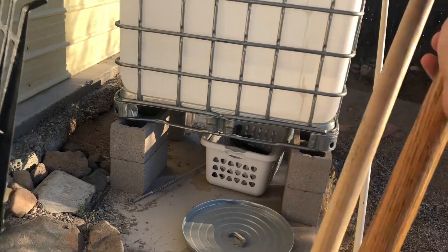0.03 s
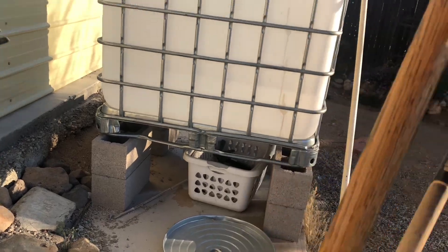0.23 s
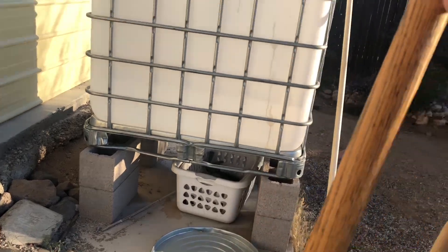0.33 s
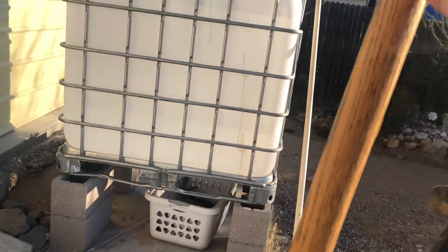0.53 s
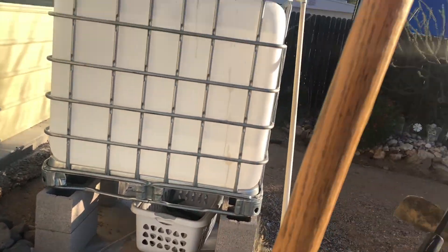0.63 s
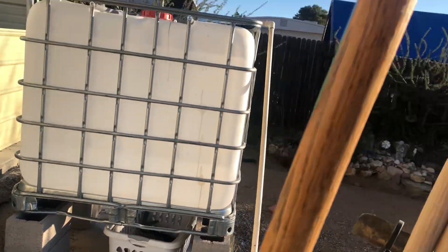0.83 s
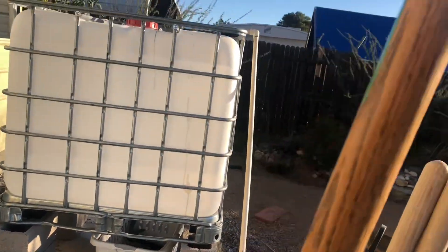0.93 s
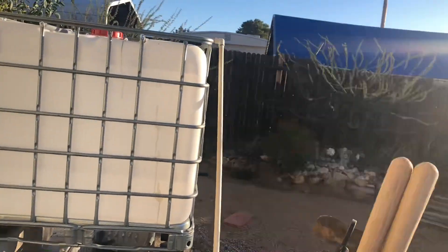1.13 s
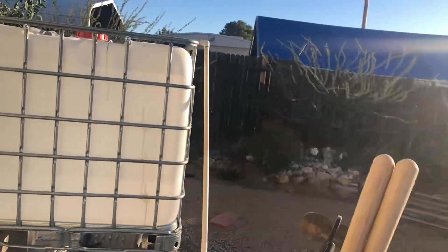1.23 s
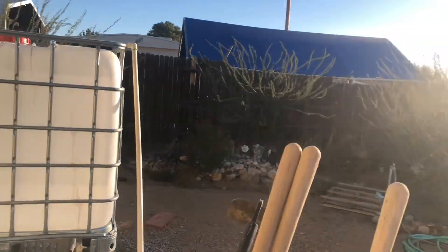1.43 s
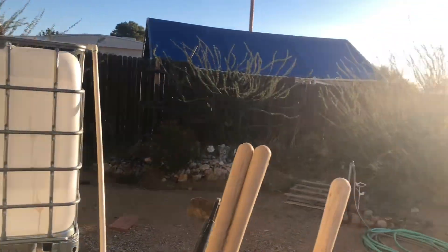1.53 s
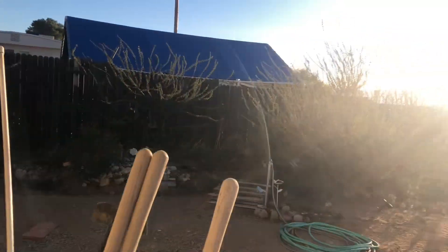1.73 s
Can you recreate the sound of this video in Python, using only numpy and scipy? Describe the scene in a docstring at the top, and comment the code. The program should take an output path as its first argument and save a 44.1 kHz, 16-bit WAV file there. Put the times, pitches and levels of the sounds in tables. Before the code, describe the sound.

Long wooden shafts rattle hollowly and rub, one slides out thinly, and a woody clack follows

```python
"""Outdoors, a long wooden handle is dragged out from a bunch of garden tools. Random stick-slip clicks make its
rubbing, dry grain and low drone; gliding tones make its squeaks. Knocks ring the neighbours hollowly through
fading tones and noise, and low tones thump below. The handle slides free in a thin hiss of tiny clicks with
sharp ticks. The tools left behind fall together with one woody, slightly metallic clack of snaps, chatter and
ringing tones. Faint outdoor air, a coloured noise, lies underneath."""
import sys
import numpy as np
from scipy import signal
from scipy.fft import rfft, irfft
from scipy.io import wavfile
from scipy.ndimage import uniform_filter1d

SR = 44100
rng = np.random.default_rng(int(sys.argv[2]) if len(sys.argv) > 2 else 0)


def generate_wav(sig):
    """Save sig (samples, or channels by samples) to the path in sys.argv[1] as 16-bit PCM at SR."""
    pcm = np.round(np.clip(np.atleast_2d(sig).T, -1, 1) * 32767).astype(np.int16)
    wavfile.write(sys.argv[1], SR, pcm)


N = 79380
T = np.arange(N) / SR  # time in seconds
# A t60 is the time a sound takes to fade by 60 dB. A colour's levels are relative, per Hz of bandwidth.


def from_db(db):
    """Turn decibels into a gain."""
    return 10 ** (np.asarray(db) / 20)


def rms_one(x):
    """Scale to an rms (average strength) of one."""
    return x / np.sqrt(np.mean(x ** 2) + 1e-20)


def level(curve):
    """Turn a table of times and decibels into a gain over time."""
    return from_db(np.interp(T, *np.transpose(curve)))


def at_hz(points, hz):
    """Read a table at a frequency, in even steps of pitch."""
    table_hz, value = np.transpose(points)
    return np.interp(np.log(hz + 0.00086), np.log(table_hz), value)  # the offset avoids log(0)


def dying(t60):
    """Fade exponentially, by 60 dB in t60 seconds."""
    return np.exp(-np.log(1000) * T / t60)


def rising(time_constant):
    """Build up smoothly from silence, with a time constant in seconds."""
    return 1 - np.exp(-T / time_constant)


def at_time(x, s):
    """Delay a sound so that it starts at s seconds."""
    silence = np.zeros(max(int(s * SR), 0))
    return np.concatenate([silence, x])[:N]


def coloured(x, colour):
    """Filter a steady texture by a colour table; the result has an rms of one."""
    gain = from_db(at_hz(colour, np.fft.rfftfreq(N, 1 / SR)))
    return rms_one(irfft(rfft(x) * gain, N))


def dense_ring(source, colour, t60s):
    """Imitate countless close resonances: third-octave noise bands, each fading at its own rate."""
    hz = np.fft.rfftfreq(N, 1 / SR)
    spectrum = rfft(coloured(source, colour))
    edges = np.geomspace(60, 17000, 25)
    ring = np.zeros(N)
    for low, high in zip(edges, edges[1:]):
        band = irfft(spectrum * ((hz >= low) & (hz < high)), N)
        ring += band * dying(at_hz(t60s, np.sqrt(low * high)))
    return ring


def mode(hz, db, t60):
    """Ring one resonance as a fading sine."""
    return from_db(db) * np.sin(2 * np.pi * hz * T) * dying(t60)


def contact(x, bright_hz, bass_hz):
    """A soft contact loses treble, a glancing one loses bass."""
    treble_cut = signal.butter(2, min(bright_hz, SR / 3), fs=SR, output="sos")
    bass_cut = signal.butter(1, bass_hz, "high", fs=SR, output="sos")
    softened = signal.sosfilt(treble_cut, x + 1e-18)
    return signal.sosfilt(bass_cut, softened)


def slips(per_s, spread_db):
    """Scatter stick-slip clicks of uneven size at random, per_s a second on average; rms of one."""
    sizes = from_db(spread_db * np.minimum(rng.exponential(1, N), 4))
    signs = rng.choice([-1, 1], N)
    return rms_one(sizes * signs * (rng.random(N) < per_s / SR))


def drift(hz):
    """Wander at random, mostly slower than hz; rms of one."""
    lowpass = signal.butter(2, hz, fs=SR, output="sos")
    return rms_one(signal.sosfilt(lowpass, rng.standard_normal(N)))


# Colour of the outdoor air: f/Hz, level/dB
AIR_COLOUR = [(25, 8.5), (60, -4), (200, -2.5), (450, -15), (900, -7.5), (2500, -28), (15500, -41)]
AIR_DB = -61.5


def outdoor_air():
    """Outdoor air is a faint steady noise, strongest in the bass."""
    return from_db(AIR_DB) * coloured(rng.standard_normal(N), AIR_COLOUR)


# Bending resonances of the handles: f/Hz, level/dB, t60/s
HANDLE_MODES = [(310, -8, 0.17), (424.6, -4.5, 0.36), (460, -4.5, 0.17), (670, -6.5, 0.18),
                (762, -12.5, 0.24), (904, -7.5, 0.24), (937.6, -12, 0.35), (1060, -13, 0.24),
                (1119, -10.5, 0.35), (1213, -14.5, 0.26), (1467, -17, 0.17), (1611, -9, 0.16),
                (2128, -6, 0.06)]
STRIKE_SPREAD_DB = 2.5
DETUNE = 0.01504  # typical shift with the point of contact, as a share of pitch


def handle_ring():
    """Each point of contact rings the handles' resonances with its own strengths and small pitch shifts."""
    ring = np.zeros(N)
    draws = rng.standard_normal((len(HANDLE_MODES), 2))
    for k, ((hz, db, t60), (shift, strength)) in enumerate(zip(HANDLE_MODES, draws)):
        tone = mode(hz * (1 + DETUNE * shift), db + STRIKE_SPREAD_DB * strength, t60)
        ring += (-1) ** k * tone
    return ring


# Colour of the ring of the whole bunch and its surroundings: f/Hz, level/dB
BUNCH_COLOUR = [(50, -33), (110, -44), (220, -18.5), (320, -3), (450, 4), (750, -7), (1600, -10),
                (2200, -9), (3100, -5), (4000, -13.5), (6000, -20.5), (15000, -12.5)]
# How long that ring lasts: f/Hz, t60/s
BUNCH_T60 = [(100, 0.84), (450, 0.5), (1500, 0.34), (3800, 0.11), (10000, 0.33)]
BUNCH_DB = -4


def bunch_rings():
    """The bunch rings as dense fading noise, a different one for each of five points of contact."""
    return [from_db(BUNCH_DB) * dense_ring(rng.standard_normal(N), BUNCH_COLOUR, BUNCH_T60)
            for _ in range(5)]


# Colour of the short first burst of a contact: f/Hz, level/dB
CRACK_COLOUR = [(100, -26.5), (420, 11.5), (1000, 0), (1600, -0.5), (2200, 1), (3800, -16), (5000, -12.5),
                (9000, -50)]
CRACK_T60_S = 0.049


def crack_noise():
    """The wood's crack starts as a coloured noise, shared by every contact."""
    return coloured(rng.standard_normal(N), CRACK_COLOUR)


def crack(noise):
    """A contact cracks briefly: the noise from a random starting point, fading fast."""
    return np.roll(noise, rng.integers(N)) * dying(CRACK_T60_S)


# Strength of the shafts' rubbing: t/s, level/dB
RUB_LEVEL = [(0, -45.5), (0.10, -47.5), (0.15, -36), (0.26, -36.5), (0.282, -24.5), (0.325, -33),
             (0.38, -32.5), (0.41, -53), (0.45, -42), (0.468, -36), (0.58, -46), (0.74, -56.5),
             (0.86, -65.5)]
SLIPS_PER_S, SLIP_SPREAD_DB = 480, 2.5
RUB_BRIGHT_HZ, RUB_BASS_HZ = 3750, 285  # treble and bass limits of the contact
RUB_MODES_DB = -7  # rubbing contact damps the resonances


def rubbing(rings, noise):
    """Stick-slip rattle at several points of contact drives the handles and the bunch."""
    out = np.zeros(N)
    for ring in rings:
        body = from_db(RUB_MODES_DB) * handle_ring() + ring + crack(noise)
        body = contact(body, RUB_BRIGHT_HZ, RUB_BASS_HZ)
        rattle = slips(SLIPS_PER_S / len(rings), SLIP_SPREAD_DB)
        rattle = rattle * level(RUB_LEVEL) / np.sqrt(len(rings))
        out += signal.fftconvolve(rattle, body / np.linalg.norm(body))[:N]  # each slip sounds the body
    return out


# Strength of the rubbing wood's dry grain: t/s, level/dB
GRAIN_LEVEL = [(0, -57.5), (0.1, -55), (0.23, -46.5), (0.36, -52.5), (0.45, -52), (0.52, -44),
               (0.55, -53.5), (0.62, -56.5), (0.70, -63), (0.96, -65.5), (1.0, -62)]
# Its colour, shared with the ticks: f/Hz, level/dB
GRAIN_COLOUR = [(700, -17), (4000, -3.5), (6000, -3.5), (8500, 2.5), (10500, 4), (12500, -1.5),
                (15500, 4.5)]
# Brief catches of the grain: t/s, level/dB, t60/s
SCUFFS = [(0.271, -30.5, 0.1), (0.404, -39, 0.11), (0.56, -31.5, 0.041), (0.588, -34, 0.029)]
SCUFF_RISE_S = 0.0059  # time constant
GRAINS_PER_S, GRAIN_SPREAD_DB = 5800, 2


def wood_grain():
    """Fine friction hisses as shaft rubs on shaft, and flares where the grain catches."""
    pressure = level(GRAIN_LEVEL)
    for s, db, t60 in SCUFFS:
        pressure += from_db(db) * at_time(rising(SCUFF_RISE_S) * dying(t60), s)
    return pressure * coloured(slips(GRAINS_PER_S, GRAIN_SPREAD_DB), GRAIN_COLOUR)


# Strength of the dragged shaft's drone: t/s, level/dB
DRONE_LEVEL = [(0, -59), (0.2, -59), (0.33, -43), (0.57, -52), (0.63, -52), (0.75, -55), (1.0, -73)]
# Its colour: f/Hz, level/dB
DRONE_COLOUR = [(50, -32), (90, -13), (110, -1.5), (150, -11), (300, -10.5), (1000, -86)]


def drone():
    """Dragging keeps the long shaft's lowest resonance humming: slips filtered down to the bass."""
    return level(DRONE_LEVEL) * coloured(slips(SLIPS_PER_S, GRAIN_SPREAD_DB), DRONE_COLOUR)


# Handle against handle: t/s, level/dB, treble limit f/Hz, bass limit f/Hz, crack level/dB within the blow
KNOCKS = [(0.069, -36.5, 600, 100, -27), (0.120, -37, 1170, 200, 0), (0.2162, -21.5, 3800, 925, 7),
          (0.221, -21, 3120, 885, 5.5), (0.229, -19, 617, 202, 3.5), (0.235, -22.5, 695, 202, 8),
          (0.274, -20, 1770, 202, 1.5), (0.286, -27, 3400, 260, 4.5), (0.301, -31, 2600, 252, 4),
          (0.320, -29.5, 3200, 397, 2), (0.355, -20, 1470, 1000, 0), (0.461, -29.5, 2570, 486, 2),
          (0.526, -35, 687, 154, 1.5), (0.646, -38.5, 1800, 365, 2.5), (1.327, -41, 3040, 900, 11.5)]
MODES_DB = -3
CONTACT_RISE_S = 0.00047  # time constant: the blow spreads through the bunch


def knocks(rings, noise):
    """A blow cracks and rings the handles and the bunch; its contact sets how bright and full it is."""
    out = np.zeros(N)
    for k, (s, db, bright_hz, bass_hz, crack_db) in enumerate(KNOCKS):
        first_burst = from_db(crack_db) * crack(noise)
        ring = from_db(MODES_DB) * handle_ring() + rings[k % len(rings)]
        blow = rising(CONTACT_RISE_S) * (ring + first_burst)
        out += from_db(db) * at_time(contact(blow, bright_hz, bass_hz), s)
    return out


# The shaft groans, creaks and hums, then squeaks faintly as it comes clear.
# One curve for each: t/s, level/dB, f/Hz
SQUEAKS = [
    [(0.08, -57, 312.6), (0.16, -45, 304.4), (0.275, -34, 292.6), (0.35, -46, 241)],
    [(0.46, -50, 915), (0.50, -40.5, 901), (0.527, -43.5, 874), (0.56, -52, 868)],
    [(0.50, -49, 420), (0.54, -34.5, 425.5), (0.58, -49.5, 430.8), (0.67, -43, 435), (0.79, -54, 433.7)],
    [(1.16, -62, 1703), (1.215, -58, 2044), (1.25, -64, 1920), (1.31, -72, 1750)],
]
SQUEAK_ROUGH = 1.0  # noise over tone at 1 kHz, growing with pitch
SQUEAK_WIDTH = 0.074  # bandwidth of that noise as a share of the pitch


def squeak(curve):
    """Wood sticks and slips in a gliding tone, roughened by random drift."""
    s, db, hz = np.transpose(curve)
    phase = 2 * np.pi * np.cumsum(np.interp(T, s, hz)) / SR
    width_hz = SQUEAK_WIDTH * hz.mean()
    rough = SQUEAK_ROUGH * hz.mean() / 1000
    noise = drift(width_hz) * np.sin(phase) + drift(width_hz) * np.cos(phase)
    tone = np.sin(phase) + rough * noise
    sounding = 1. * ((T > s[0]) & (T < s[-1]))
    gate = uniform_filter1d(sounding, size=400)  # softens the start and end
    return from_db(np.interp(T, s, db)) * gate * rms_one(tone)


def squeaks():
    """Add up the stick-slip tones of the moving shaft."""
    return sum(squeak(curve) for curve in SQUEAKS)


# Heavy blows also thump whatever the tools lean on: t/s, level/dB
THUMPS = [(0.219, -44.5), (0.27, -21), (1.33, -30)]
# Its low resonances: f/Hz, level/dB, t60/s
THUMP_MODES = [(97, -8.5, 0.18), (100.6, -1.5, 0.16)]
THUMP_RISE_S = 0.013  # time constant


def thumps():
    """Heavy blows boom in two close low resonances that swell softly and fade."""
    boom = rising(THUMP_RISE_S) * sum(mode(*row) for row in THUMP_MODES)
    return sum(from_db(db) * at_time(boom, s) for s, db in THUMPS)


# Strength of the shaft sliding free: t/s, level/dB
SLIDE_LEVEL = [(0.974, -67), (0.981, -51), (1.025, -49), (1.055, -48), (1.08, -45), (1.105, -46.5),
               (1.168, -46), (1.187, -65), (1.215, -64), (1.23, -50.5), (1.246, -70), (1.275, -55.5),
               (1.31, -56.5), (1.35, -89), (1.72, -73), (1.78, -58.5)]
# Its colour: f/Hz, level/dB
SLIDE_COLOUR = [(100, 1), (400, 0), (800, -12), (4000, -12), (4650, 2), (5500, -8), (7600, -14), (9200, -3),
                (10500, -5), (11900, 5), (13000, -2), (15700, -8)]
SLIDE_GRAINS_PER_S = 2100
SLIDE_FLUTTER_DB, SLIDE_FLUTTER_HZ = 2, 68.6  # typical size and top rate of the unsteadiness


def slide():
    """The shaft slides out with a thin, unsteady hiss made of many tiny slips."""
    flutter = from_db(SLIDE_FLUTTER_DB * drift(SLIDE_FLUTTER_HZ))
    hiss = coloured(slips(SLIDE_GRAINS_PER_S, SLIP_SPREAD_DB), SLIDE_COLOUR)
    return level(SLIDE_LEVEL) * rms_one(flutter * hiss)


# Sharp ticks of the sliding shaft, and the first snap of the clashing tools: t/s, level/dB
TICKS = [(0.978, -38), (1.0885, -26.5), (1.127, -30), (1.166, -28.5), (1.336, -26), (1.347, -27),
         (1.789, -33)]
TICK_T60_S = 0.0022


def ticks():
    """The sliding shaft ticks and the clashing tools snap in very short bursts of grain-coloured noise."""
    strength = sum(from_db(db) * at_time(dying(TICK_T60_S), s) for s, db in TICKS)
    return strength * coloured(rng.standard_normal(N), GRAIN_COLOUR)


# Soft bumps of the hand: t/s, level/dB, f/Hz, t60/s
BUMPS = [(0.980, -32.5, 172, 0.014), (1.045, -48.5, 386, 0.058), (1.137, -44, 42, 0.25),
         (1.160, -47.5, 407, 0.067)]


def hand_bumps():
    """The hand bumps softly, each time with one fading tone."""
    return sum(at_time(mode(hz, db, t60), s) for s, db, hz, t60 in BUMPS)


# The tools fall together, heads clashing: t/s, level/dB
CLASHES = [(1.332, -33.5), (1.335, -30.5), (1.3466, -32)]
# Colour of their chatter: f/Hz, level/dB
CLASH_COLOUR = [(50, -29), (100, -1), (220, -11), (450, 1.5), (1000, -9), (1900, -5), (3800, -17.5),
                (7100, -10.5), (9500, -17.5), (15500, -17.5)]
# How long the chatter rings: f/Hz, t60/s
CLASH_T60 = [(150, 0.36), (450, 0.58), (1500, 0.37), (3000, 0.41), (6500, 0.19), (12000, 0.16)]
# The main contact rings wood and heads: f/Hz, level/dB, t60/s
CLACK_MODES = [(408, -19.5, 0.039), (437, -26, 0.43), (697, -36.5, 0.36), (859, -40.5, 0.56),
               (1420, -44, 0.33), (1911, -37.5, 0.28), (7390, -45.5, 0.28)]
CHATTERS_PER_S = 2700


def clash():
    """The tools land in a quick run of chattering contacts; the second and hardest sets them ringing."""
    chatter = np.zeros(N)
    for s, db in CLASHES:
        clicks = slips(CHATTERS_PER_S, GRAIN_SPREAD_DB)
        chatter += from_db(db) * at_time(dense_ring(clicks, CLASH_COLOUR, CLASH_T60), s)
    clack = sum(mode(*row) for row in CLACK_MODES)
    return chatter + at_time(clack, CLASHES[1][0])


def scene():
    """Add all sources over the outdoor air, in mono."""
    rings, noise = bunch_rings(), crack_noise()  # knocks and rubbing drive the same bunch
    dragging = rubbing(rings, noise) + wood_grain() + drone() + squeaks()
    blows = knocks(rings, noise) + thumps() + hand_bumps()
    release = slide() + ticks() + clash()
    return (outdoor_air() + dragging + blows + release)[None]


def record(dry):
    """Cut the treble steeply above 15750 Hz."""
    treble_cut = signal.ellip(12, .1, 80, 15750, fs=SR, output="sos")
    return signal.sosfilt(treble_cut, dry)


dry = scene()
out = record(dry)
generate_wav(out)
```